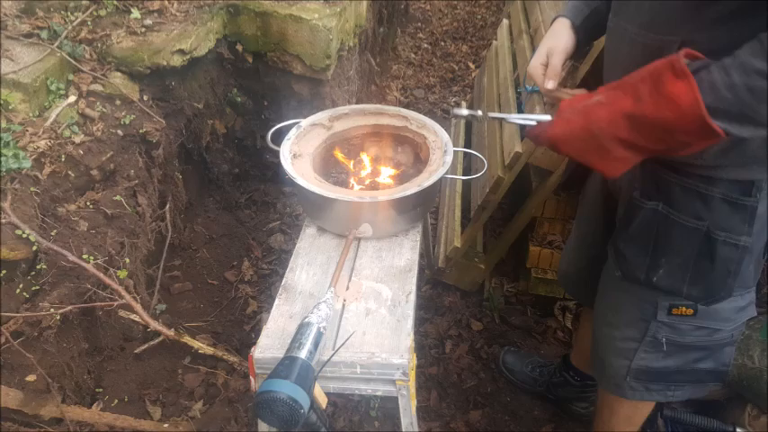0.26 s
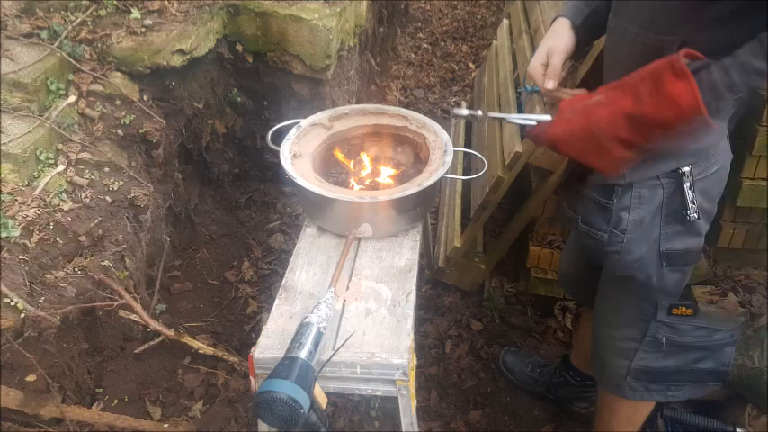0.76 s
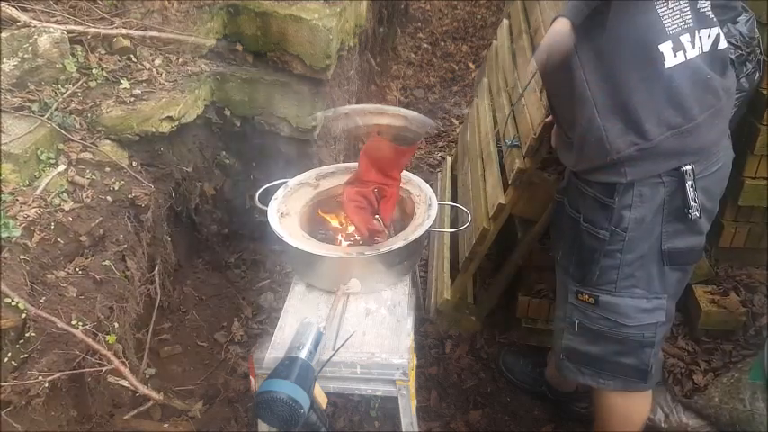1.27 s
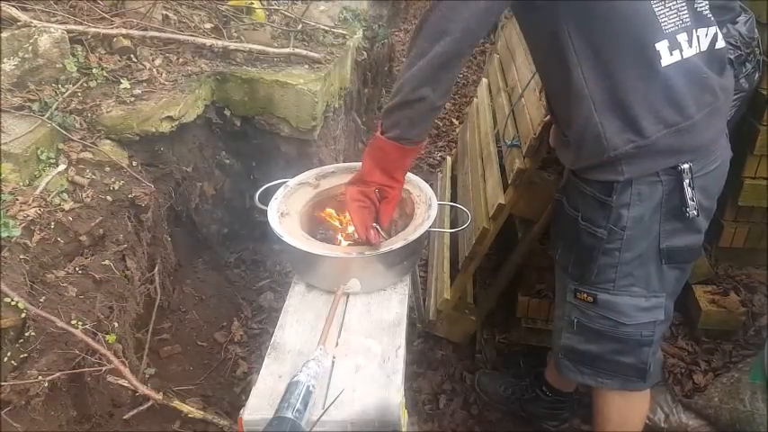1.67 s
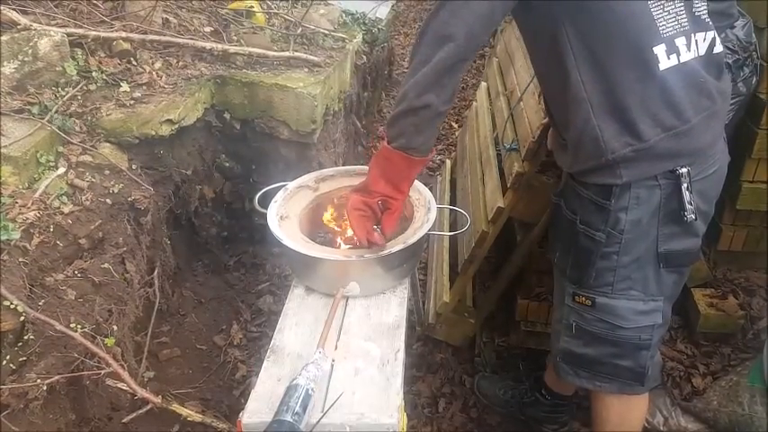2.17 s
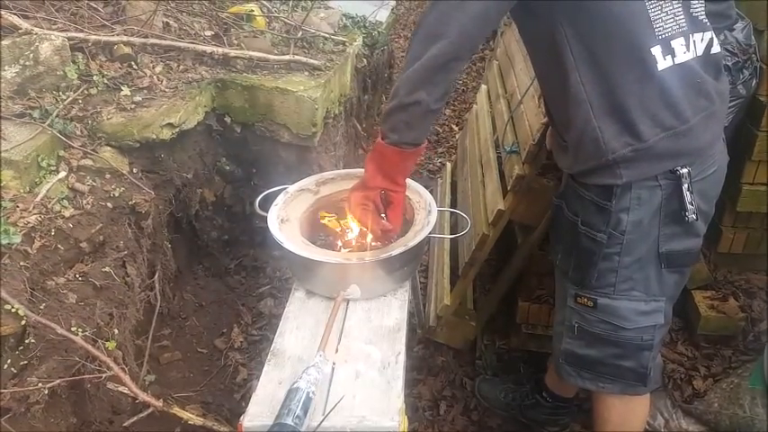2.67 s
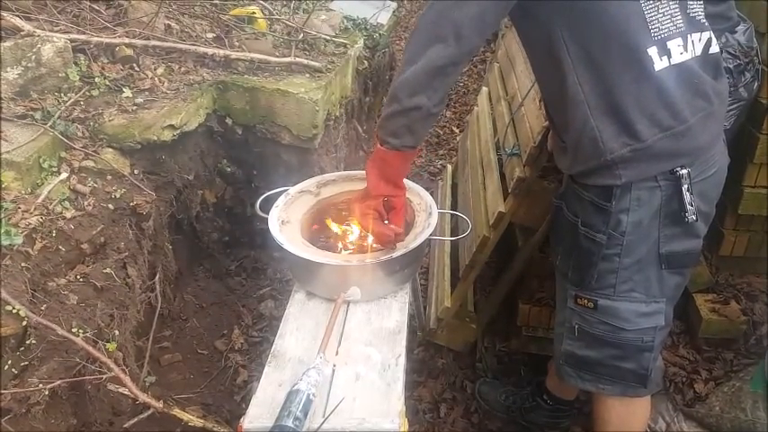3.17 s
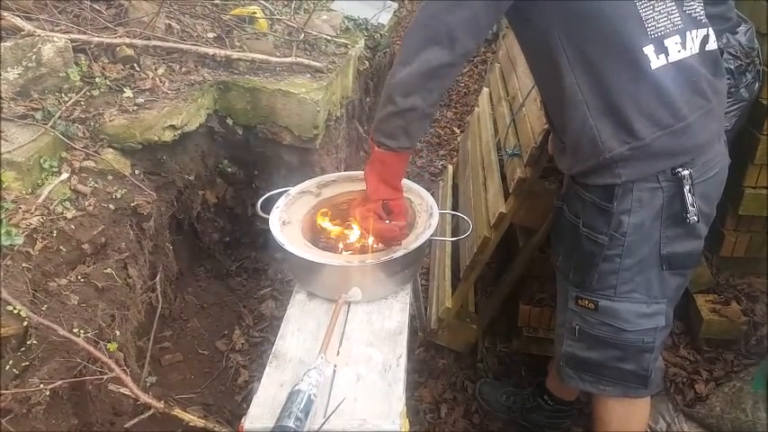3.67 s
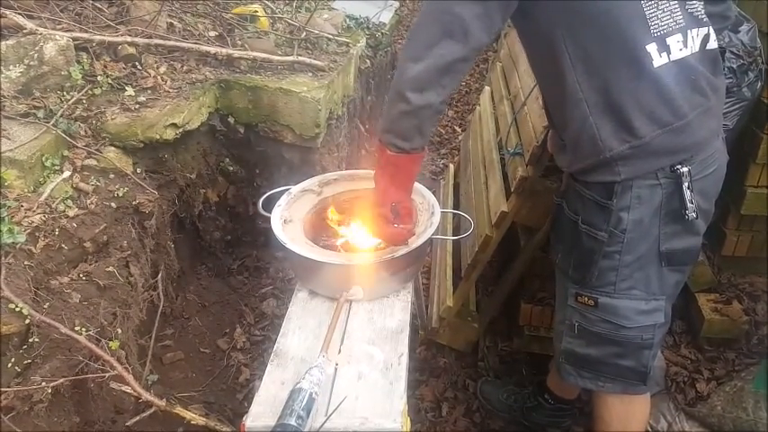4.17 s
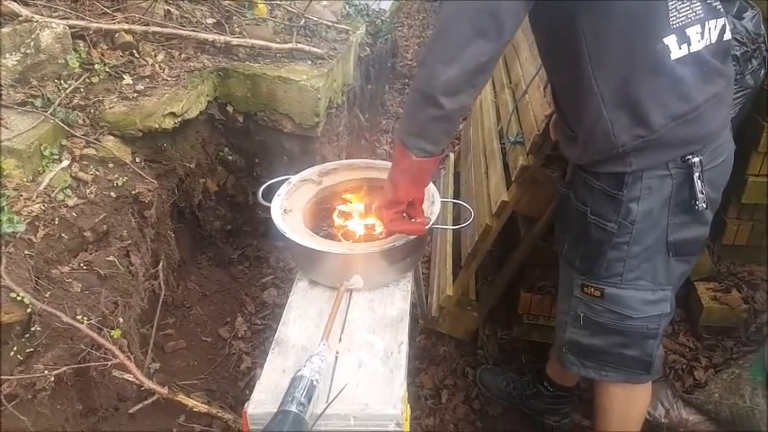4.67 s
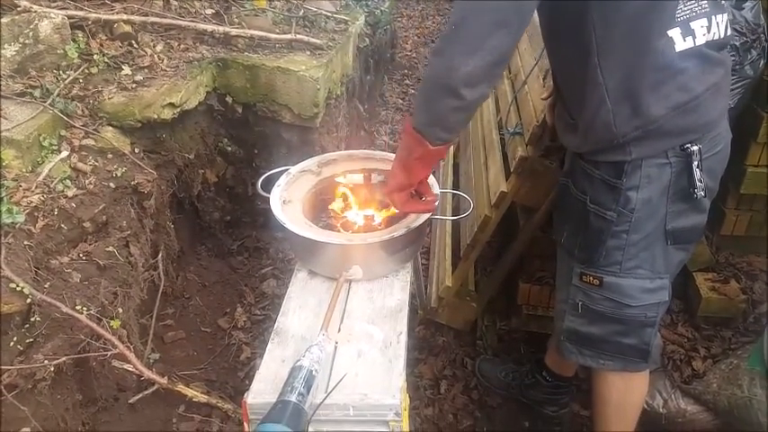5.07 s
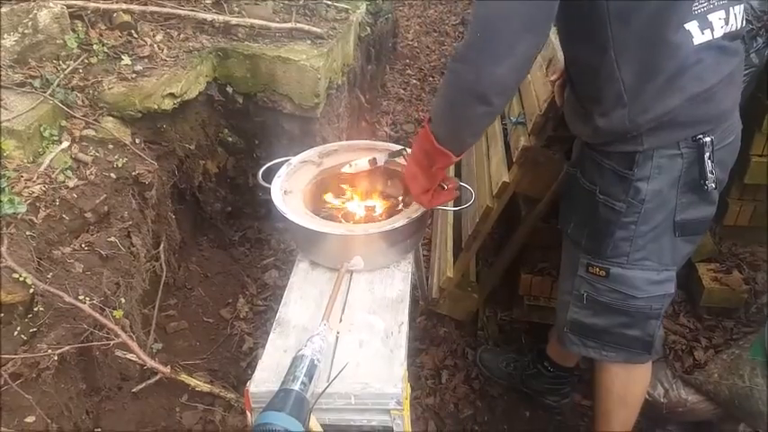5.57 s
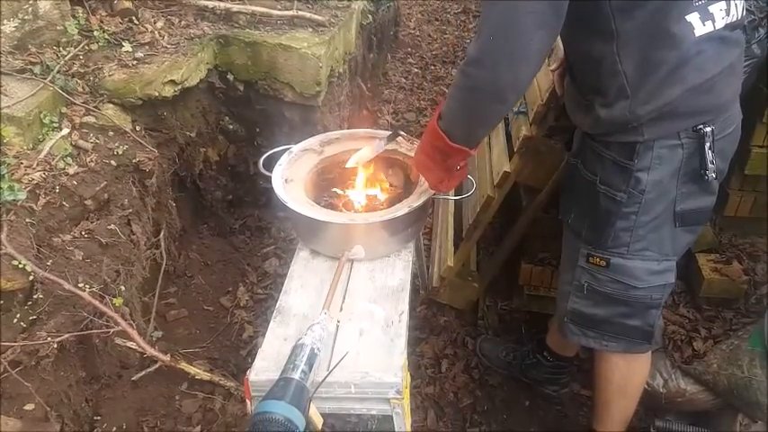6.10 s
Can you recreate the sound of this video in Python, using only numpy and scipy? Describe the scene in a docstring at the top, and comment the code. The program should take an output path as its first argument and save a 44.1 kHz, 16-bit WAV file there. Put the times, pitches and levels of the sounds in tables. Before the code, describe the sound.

A hairdryer blows steadily into a small fire outdoors, humming and hissing over a low roar, with a few light taps and knocks.

```python
"""Outdoors, a hairdryer blows through a pipe into a small forge in a steel pot. The sound fades in on
the running dryer: its fan hums and rushes, the jet hisses, the fire flutters and its low roar swells
briefly now and then. Near 3.9 s light taps land by the right microphone, which faces away, and fuel
shifts under a gloved hand, knocking on the pot. The flames flare up, then the hand draws back and the
hollow note of the pot's mouth falls away. Dryer and fire run on, with two more brief swells."""
import sys
import numpy as np
from scipy.fft import rfft, irfft, next_fast_len
from scipy.io import wavfile
from scipy.ndimage import map_coordinates

SR = 44100
rng = np.random.default_rng(int(sys.argv[2]) if len(sys.argv) > 2 else 0)


def transcribe(signal):
    """Save signal, clipped to [-1, 1], as a 16-bit WAV file at the path in sys.argv[1]."""
    frames = np.atleast_2d(signal).T
    limited = np.clip(frames, -1, 1)
    pcm = np.round(limited * 32767).astype(np.int16)
    wavfile.write(sys.argv[1], SR, pcm)


N = 279594

# how far the right microphone trails the left: f/Hz, lag/rad
RIGHT_LAG = [(170, 0.086), (400, 0.56), (900, 1.24), (1100, 1.7), (1900, 2.57), (2900, 1.9), (3700, 2.9),
             (4800, 3.7), (5300, 6.3), (7500, 6.9)]
# low roar or flames swell briefly at odd moments: crest t/s, length/s, flame lift/dB, roar lift/dB
FIRE_SWELLS = [(1.12, 0.25, -1, 2.8), (1.658, 0.15, 0, 2.5), (2.45, .4, 0, 0.5), (3.95, 0.12, -1, 2),
               (4.164, 0.086, 8.5, 1.5), (4.34, 0.31, 7, 3), (5.44, 0.18, -3, 2.3), (6.26, 0.059, 7.5, -1)]


def amp(db):
    """Decibels to gain."""
    return 10 ** (np.asarray(db) / 20)


def rms(x):
    """Root mean square."""
    return np.sqrt(np.mean(x ** 2) + 1e-20)


def along(points, hz):
    """A curve of (f/Hz, value) points, read on a log frequency axis."""
    f, v = np.transpose(points)
    return np.interp(np.log(hz + 1), np.log(f + 1), v)


def lift(resonances, hz):
    """Bell EQ: the dB that a set of resonances adds at each frequency."""
    return sum(db * .5 ** ((2 * (hz - centre) / width) ** 2) for centre, width, db in resonances)


def wobble(rate):
    """A smooth random curve, rate knots a second."""
    return map_coordinates(rng.standard_normal(int(N * rate / SR) + 4), [np.arange(N) * rate / SR])


def swell(crest_s, length_s):
    """A bell of height 1, length_s wide at half height."""
    return .5 ** ((2 * (np.arange(N) / SR - crest_s) / length_s) ** 2)


def ramp(start_s, length_s):
    """A straight rise from 0 to 1."""
    return np.clip((np.arange(N) / SR - start_s) / length_s, 0, 1)


def turbulence(spectrum, resonances=(), echo_db=-22, echo_t60=0.051):
    """Stereo air noise coloured by a cavity: rms 1 on the left, later and duller on the right."""
    # shadow on the right microphone: f/Hz, level against the left/dB
    shadow = [(480, 0), (620, -2), (820, -4.5), (1900, -7), (2350, -15), (3200, -8.5), (5050, -7),
              (5500, -15.5), (7700, -30.5), (8200, -33), (9600, -35), (10600, -12.5), (12000, -13),
              (14000, -18)]
    # ripple on the right as sound bends round the microphones' case: f/Hz, width/Hz, lift/dB
    case_ripple = [(1100, 290, 2.5), (1330, 110, 4.5), (1540, 130, -6), (1690, 110, 2), (3880, 200, -7),
                   (4700, 200, -3.5)]
    # likeness of left and right: f/Hz, coherence/0-1
    coherence = [(60, 0.75), (200, .97), (800, 0.88), (1400, 0.76), (2100, 0.61), (3200, 0.76),
                 (6000, 0.39), (9000, .2), (12000, .35), (15000, .1)]
    m = next_fast_len(N + 8192)
    hz = np.fft.rfftfreq(m, 1 / SR)
    t = np.arange(SR // 16) / SR
    echoes = rng.standard_normal(len(t)) * amp(-60 * t / echo_t60) * (t > .006)  # off fence and bank
    yard = 1 + amp(echo_db) * rfft(echoes / np.linalg.norm(echoes), m)
    colour = amp(along(spectrum, hz) + lift(resonances, hz))
    direct, scattered = rfft(rng.standard_normal((2, m))) * yard * colour
    alike = along(coherence, hz)
    shade = amp(along(shadow, hz) + lift(case_ripple, hz)) * np.exp(-1j * along(RIGHT_LAG, hz))
    right = shade * (alike * direct + np.sqrt(1 - alike ** 2) * scattered)
    pair = irfft(np.array([direct, right]), m)[:, :N]
    return pair / rms(pair[0])


def fan_hum(shaft_hz=203.4, drift=0.0005025, waver_db=1.5, blur_rad=0.21):
    """The fan hums on harmonics of its shaft; uneven inflow makes each waver in level and phase."""
    # fan tones: multiple of the shaft rate, left rms level/dB, right rms level/dB
    harmonics = [(1, -50.5, -50.5), (3, -41.5, -45.5), (5, -46, -48.5), (6, -45.5, -59), (7, -47.5, -51),
                 (8, -53, -55), (11, -46.5, -72), (14, -48, -50), (15, -53, -72), (16, -48, -65),
                 (30, -65, -81), (37, -61, -88)]
    turns = np.cumsum(shaft_hz * (1 + drift * wobble(1.5))) / SR
    hum = np.zeros((2, N))
    for multiple, left_db, right_db in harmonics:
        phase = 2 * np.pi * (multiple * turns + rng.random()) + blur_rad * wobble(16)
        waver = amp(waver_db * wobble(7))
        lag = along(RIGHT_LAG, multiple * shaft_hz)
        tone = np.array([amp(left_db) * np.sin(phase), amp(right_db) * np.sin(phase - lag)])
        hum += waver / rms(waver) * tone
    return np.sqrt(2) * hum


def airflow(rush_db=-27.5, hiss_db=-34.5, flutter_db=0.4, wander_db=0.02):
    """Air rushes through the housing and hisses at the nozzle; the jet wanders and eddies shake both."""
    # broad rush inside the dryer: f/Hz, relative level/dB
    rush_spectrum = [(150, -35), (350, -6.5), (650, -1), (1000, 0), (2000, -0.5), (3300, 0.5), (4000, -2),
                     (4300, -6.5), (5000, -14), (7000, -54)]
    # resonances of the housing: f/Hz, width/Hz, lift/dB
    housing = [(724, 143, 6), (918, 44, 7), (1030, 58, -0.1), (1119, 49, 4), (1200, 81, 6.5),
               (1460, 33, -7), (1537, 109, 9), (1626, 65, 6), (1650, 43, -4.5), (1872, 71, 4),
               (2120, 57, 2), (2250, 88, 4), (2590, 180, 2), (2990, 130, 1), (3464, 53, -8), (3560, 240, 2),
               (3980, 71, 4)]
    # bright hiss of the jet: f/Hz, relative level/dB
    hiss_spectrum = [(2000, -15.5), (4200, -9), (5200, -3.5), (7000, 0.5), (8200, 0), (9500, -3),
                     (10100, -9.5), (10650, -18), (11300, -13), (12400, -12.5), (14000, -14.5),
                     (15700, -21)]
    # resonances of the nozzle: f/Hz, width/Hz, lift/dB
    nozzle = [(5150, 52, 6), (5400, 200, -1.5), (5910, 340, 4.5), (6590, 250, 4.5), (7500, 440, 2)]
    hand_clear = ramp(start_s=4.27, length_s=0.66)  # a touch louder once the hand is out of the way
    rush = amp(rush_db + 0.05 * hand_clear) * turbulence(rush_spectrum, housing)
    hiss_gain = amp(hiss_db + 0.7 * hand_clear + wander_db * wobble(3.92))
    hiss = hiss_gain * turbulence(hiss_spectrum, nozzle)
    return (rush + hiss) * amp(flutter_db * wobble(60))


def flames(rest_db=-60.5, lick_db=0.8):
    """Flames flap above the fuel: a low flutter that leaps on some of the swells."""
    # rumble of the flames: f/Hz, relative level/dB
    flame_spectrum = [(15, -25), (40, -7), (75, 0.5), (105, -1.5), (140, -7.5), (250, -13), (800, -80)]
    level_db = rest_db + sum(db * swell(s, length) for s, length, db, _ in FIRE_SWELLS)
    return amp(level_db + lick_db * wobble(16)) * turbulence(flame_spectrum)


def draught(rest_db=-35, surge_db=0.6):
    """The draught roars through the burning fuel and sounds the pot's mouth; the two surge together."""
    # body of the roar: f/Hz, relative level/dB
    roar_spectrum = [(90, -40), (145, -20), (170, -11.5), (210, -3), (300, -0.5), (550, -1), (700, -11),
                     (1200, -7.5), (2500, -30), (6000, -72)]
    # resonances of pipe and pot: f/Hz, width/Hz, lift/dB
    pipe_and_pot = [(207, 8.9, 2.5), (363, 96, 4), (441, 42, -8), (495, 53, 0)]
    # hollow note of the pot's mouth: f/Hz, relative level/dB
    hollow_spectrum = [(300, -40), (440, -14), (490, -1), (525, -2.5), (580, -9), (800, -42)]
    # that note's envelope, strongest while the glove covers the mouth: t/s, level/dB
    hollow_envelope = [(1.7, -40.5), (2.9, -41), (3.7, -43), (3.92, -36.5), (4.35, -39.5), (4.6, -57)]
    roar_db = rest_db + sum(db * swell(s, length) for s, length, _, db in FIRE_SWELLS)
    hollow_db = np.interp(np.arange(N) / SR, *np.transpose(hollow_envelope))
    roar = amp(roar_db) * turbulence(roar_spectrum, pipe_and_pot)
    hollow = amp(hollow_db) * turbulence(hollow_spectrum)
    return (roar + hollow) * amp(surge_db * wobble(25))


def taps(push_s=0.00054, rise_s=.00009, left_db=-20):
    """Each tap on the case by the right microphone is one short push of pressure with no ring."""
    # light taps: t/s, peak level on the right/dB
    tap_cues = [(3.849, -17), (3.875, -25), (3.9003, -27)]
    t = np.arange(SR // 100) / SR
    pulse = (1 - t / push_s) * np.exp(-t / push_s) * (1 - np.exp(-t / rise_s))
    right = np.zeros(N)
    for s, db in tap_cues:
        right[round(s * SR):][:len(t)] += amp(db) * pulse / pulse.max()
    return np.array([amp(left_db) * right, right])


def fuel_knocks(attack_s=.002, scatter_db=2.7):
    """Each shifting piece of fuel knocks softly on the pot, which rings briefly."""
    # pieces shifting: t/s, gain/dB
    knock_cues = [(3.87, -30), (3.895, -28), (3.924, -24.5), (3.966, -30)]
    # modes of the struck steel pot: f/Hz, relative level/dB, t60/s
    pot_modes = [(333.4, -15, .07), (512, -3, 0.096), (590, -1, 0.068), (1155, -1, 0.048)]
    t = np.arange(SR // 4) / SR
    knocks = np.zeros(N)
    for s, knock_db in knock_cues:
        ring = sum(amp(db + rng.normal(0, scatter_db) - 60 * t / t60) * np.sin(2 * np.pi * hz * t)
                   for hz, db, t60 in pot_modes)
        knocks[round(s * SR):][:len(t)] += amp(knock_db) * ring * (1 - np.exp(-t / attack_s))
    return knocks


def scene():
    """A bed of dryer and fire in the open air, with one short cluster of taps and knocks."""
    return fan_hum() + airflow() + flames() + draught() + taps() + fuel_knocks()


def record(dry):
    """A short, nearly straight fade-in from silence, then a steep high cut."""
    cutoff_hz = 15740
    faded = dry * ramp(start_s=0.65, length_s=.29) ** 1.03
    m = next_fast_len(N + SR // 2)
    high_cut = np.interp(np.fft.rfftfreq(m, 1 / SR), [cutoff_hz, cutoff_hz + 100], [1, 0])
    return irfft(rfft(faded, m) * high_cut, m)[..., :N]


dry = scene()
out = record(dry)
transcribe(out)
```